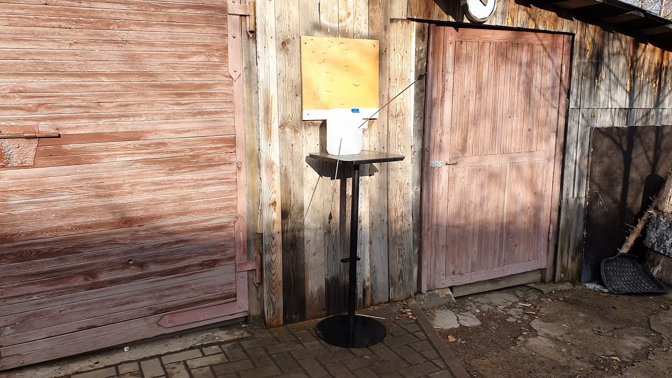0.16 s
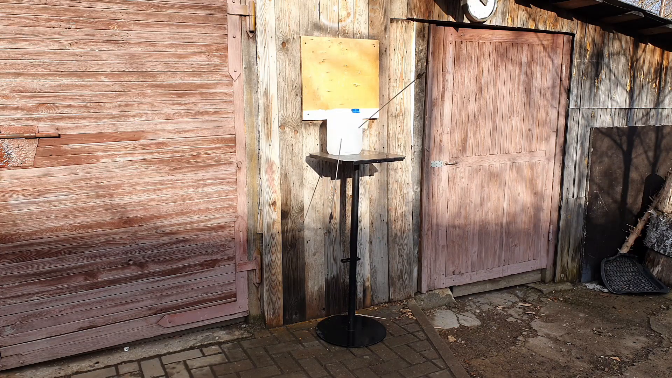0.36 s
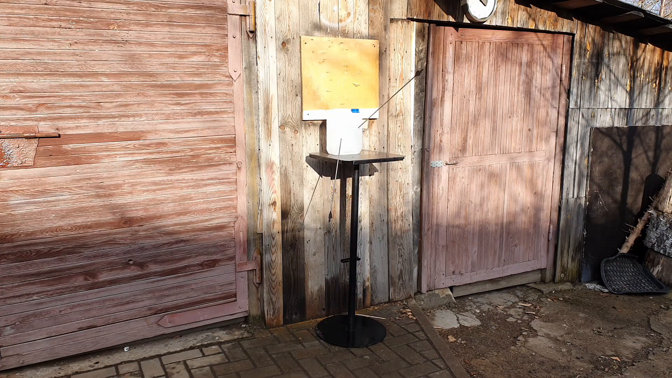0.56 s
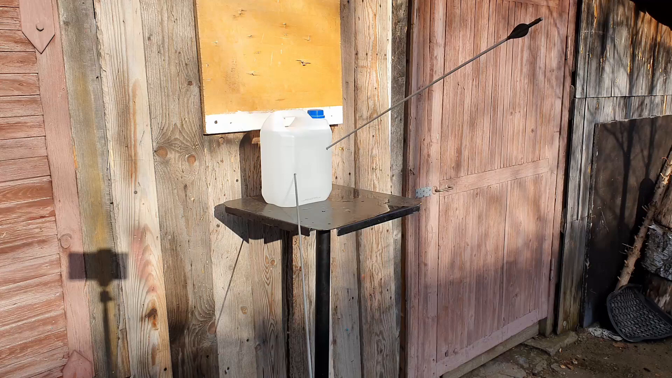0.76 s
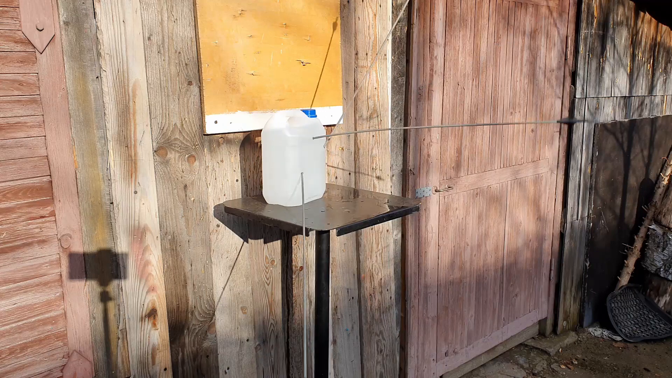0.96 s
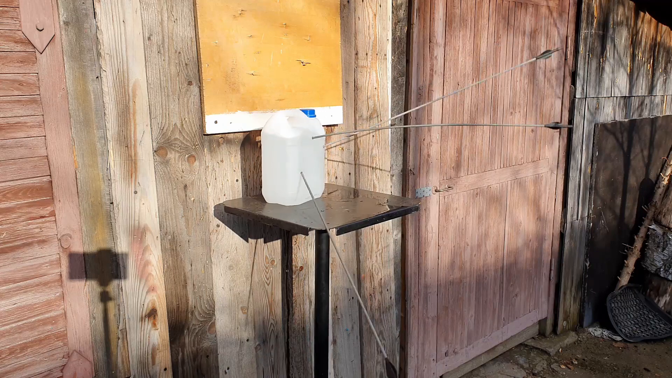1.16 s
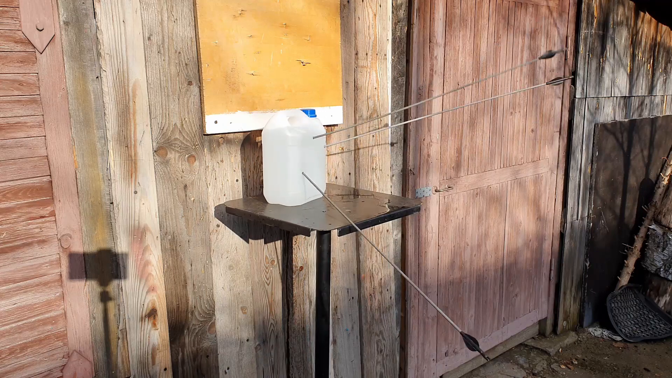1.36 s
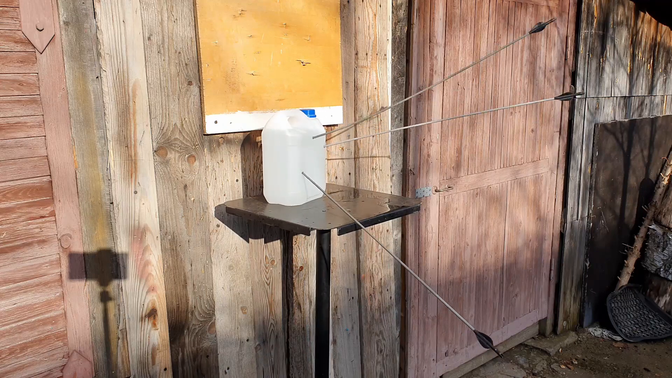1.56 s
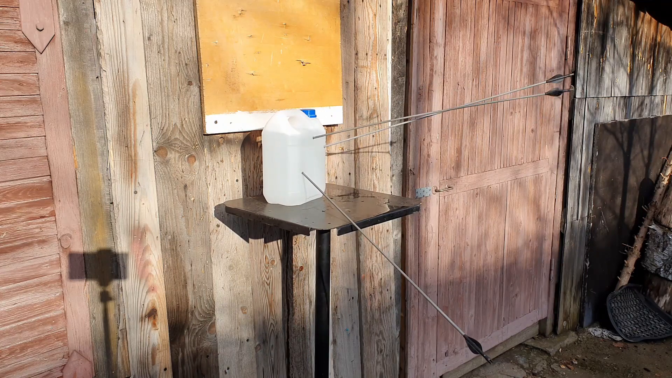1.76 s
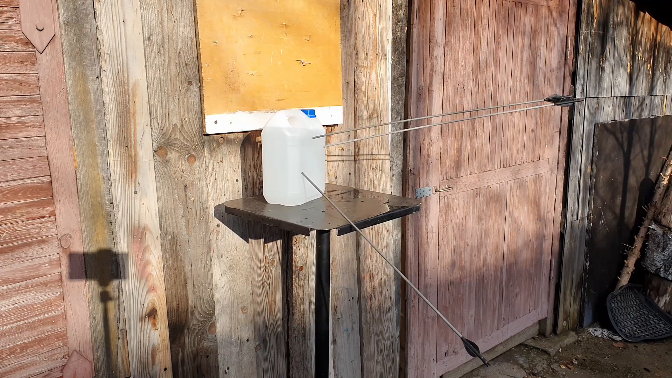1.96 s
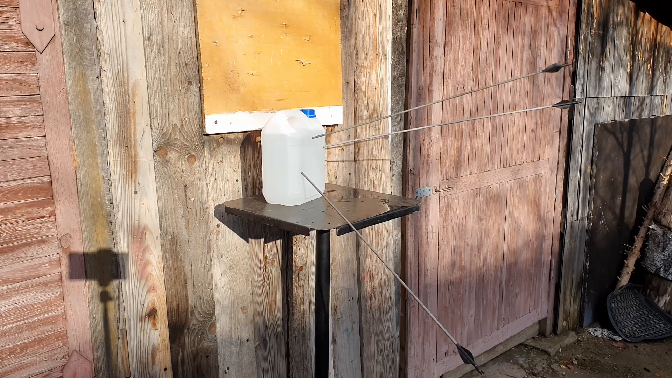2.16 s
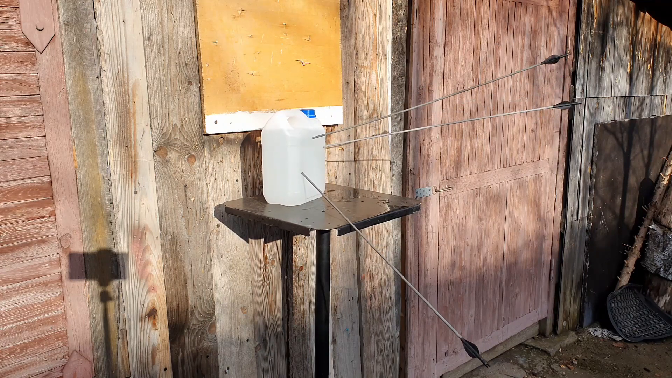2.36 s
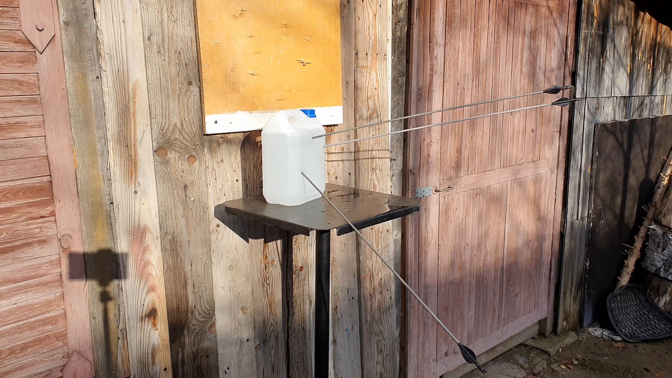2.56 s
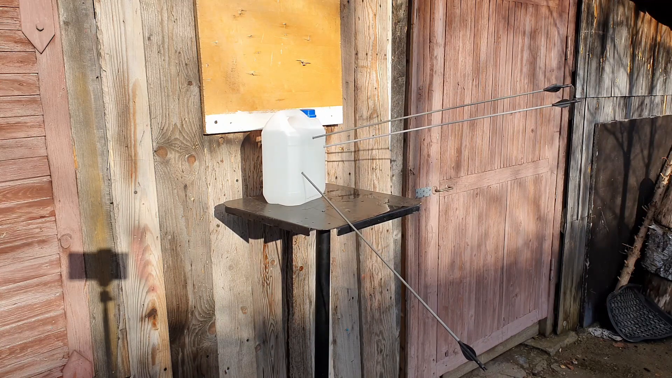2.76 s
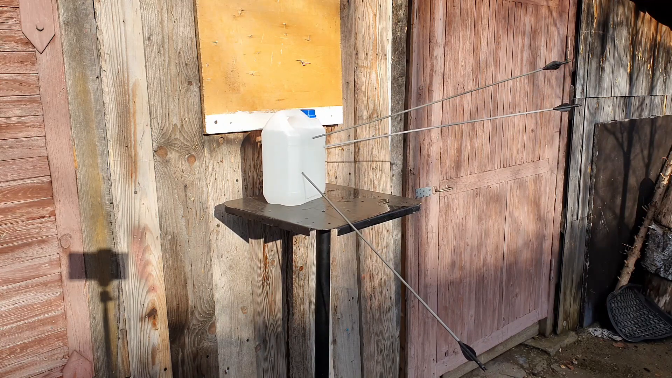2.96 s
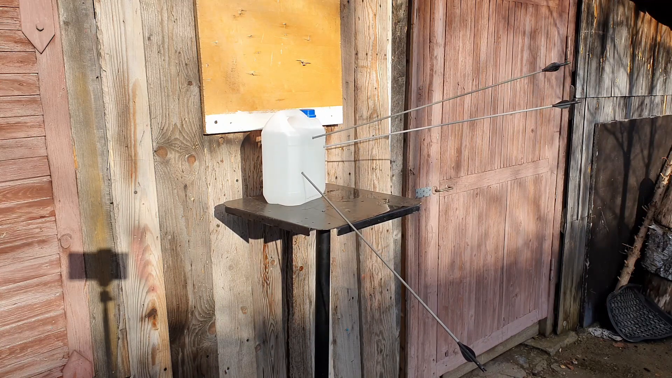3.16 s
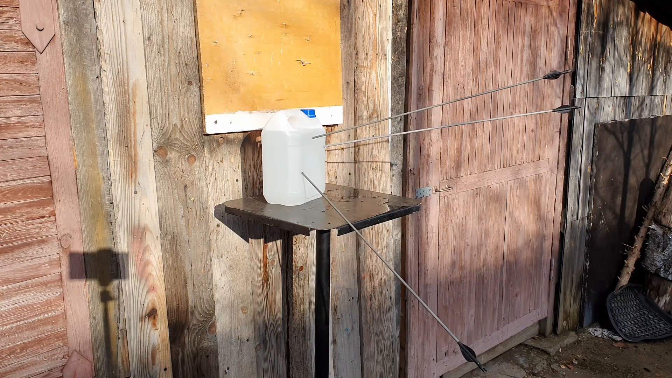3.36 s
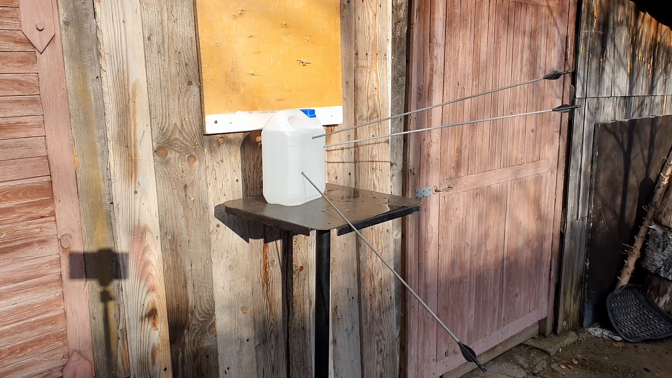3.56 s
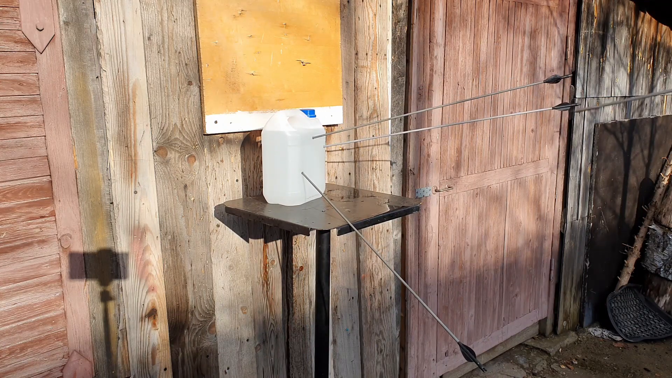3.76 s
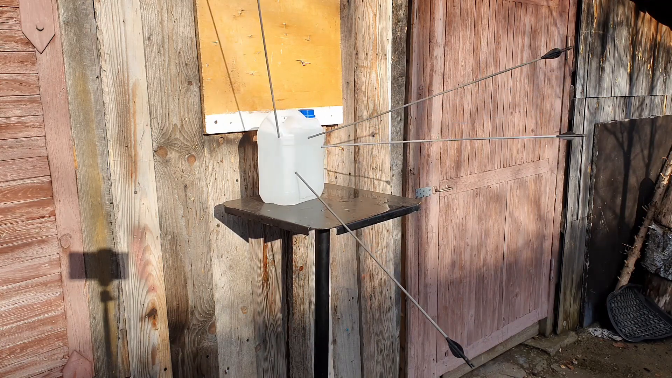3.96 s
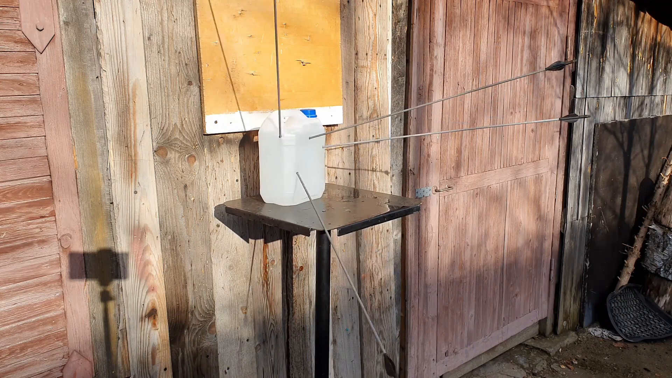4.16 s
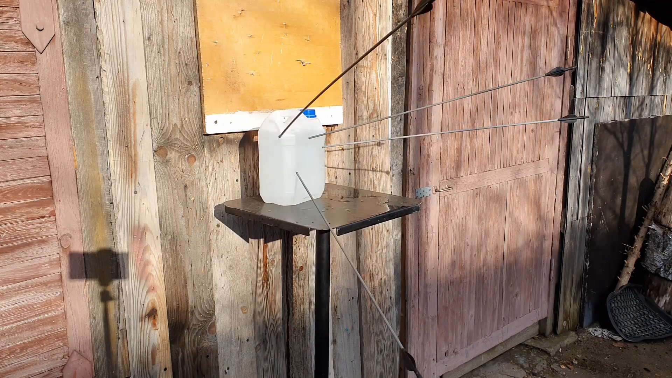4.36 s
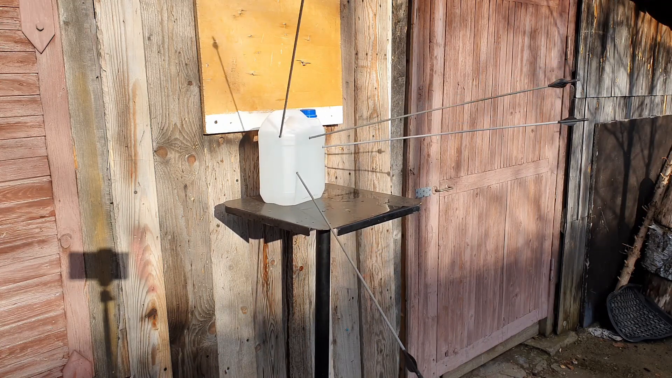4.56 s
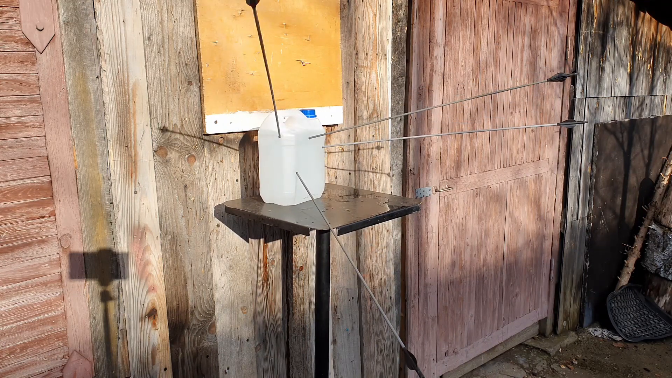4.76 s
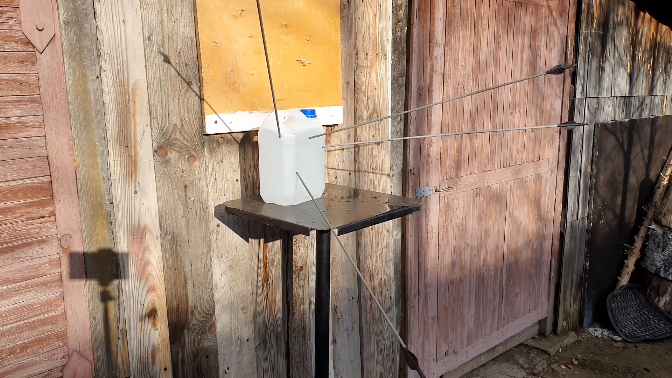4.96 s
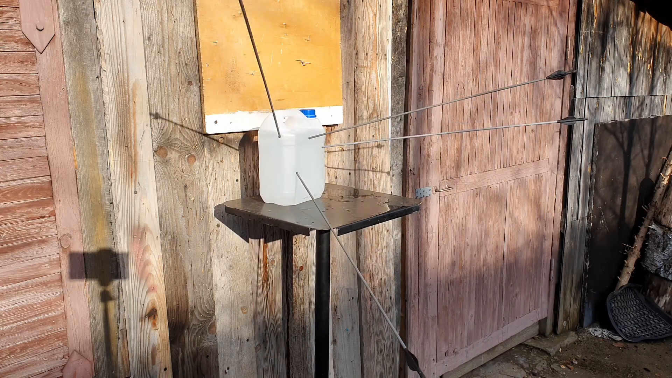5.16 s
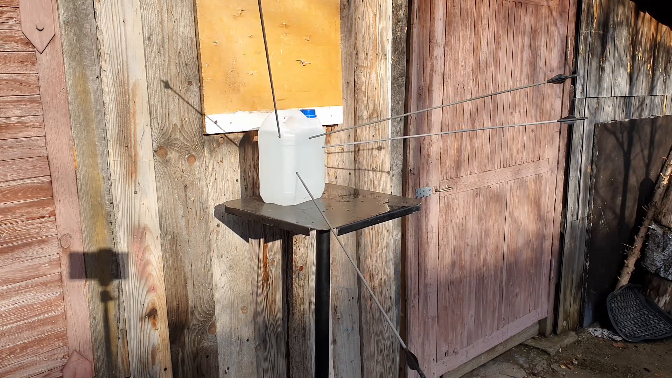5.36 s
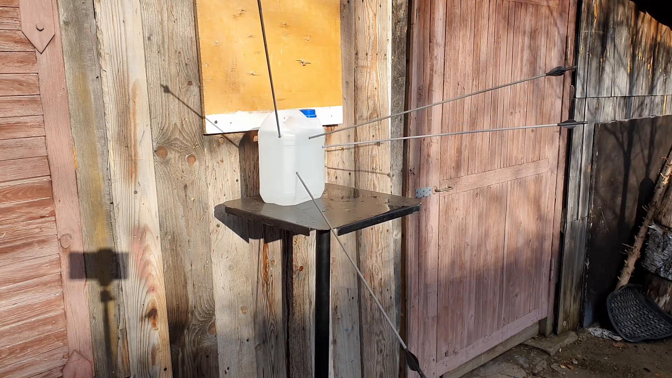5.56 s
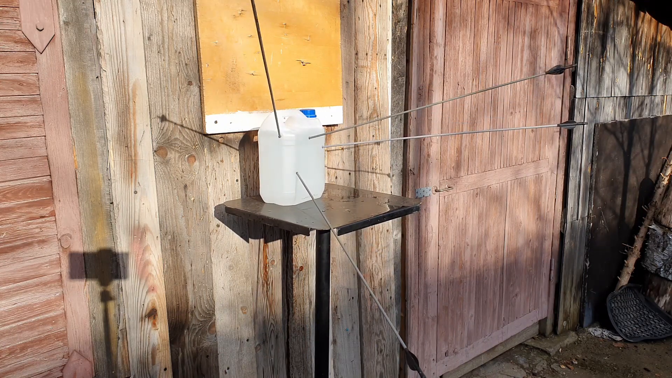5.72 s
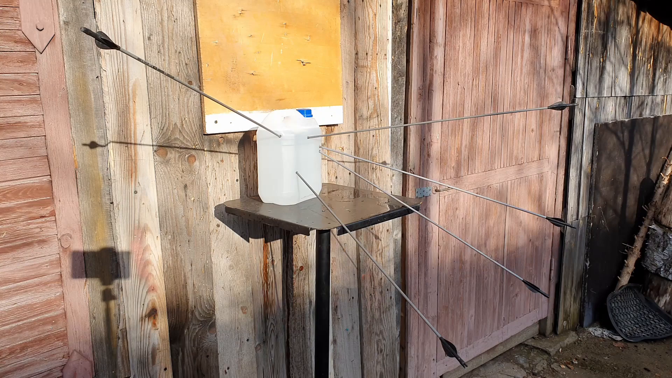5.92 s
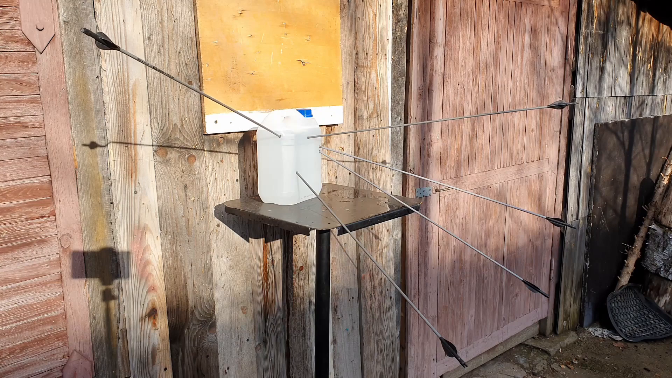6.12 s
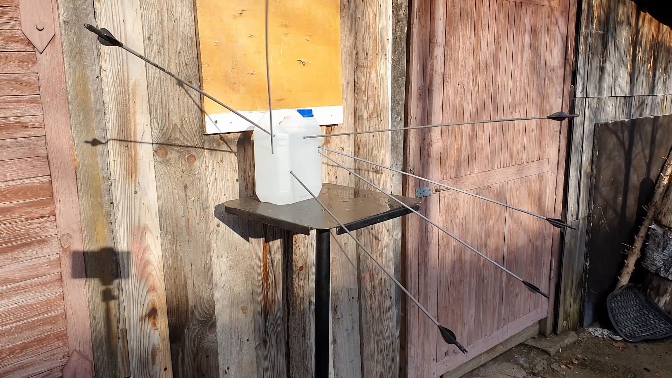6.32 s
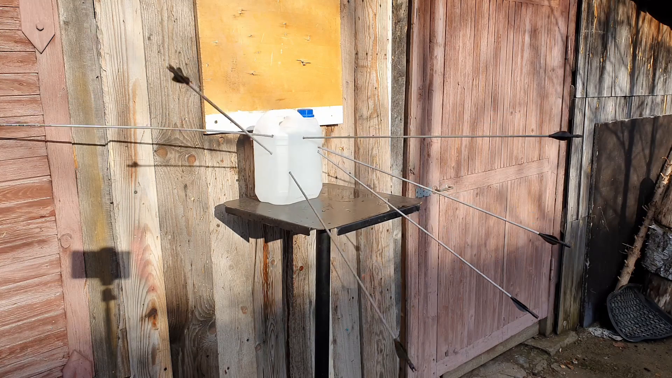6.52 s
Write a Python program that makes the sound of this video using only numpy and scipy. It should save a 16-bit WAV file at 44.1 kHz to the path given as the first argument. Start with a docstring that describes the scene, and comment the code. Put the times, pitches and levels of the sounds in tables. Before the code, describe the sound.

Three bow snaps, each followed by an arrow cracking into a plastic jug and booming plank wall, with shafts tapping and buzzing afterwards outdoors.

```python
"""Arrows crack into a plastic jug against the plank wall of a shed; their shafts then whip, tap and buzz.
Each contact is a cluster of ticks, filtered by the resonances of the jug and reflected by a quiet yard.
The blows excite decaying plank modes and a boom of the whole shed; the boards shudder after each knock.
Three shots begin with a bow snap and a hiss of air; rumble, a far hoot and a soft rush lie behind.
The right channel is the brighter one, and turns thin for the last shot."""
import sys
import numpy as np
from scipy import signal
from scipy.fft import rfft, irfft, next_fast_len
from scipy.io import wavfile

SR = 44100
rng = np.random.default_rng(int(sys.argv[2]) if len(sys.argv) > 2 else 0)


def dump(signal):
    """Clip the signal to [-1, 1] and save it as 16-bit WAV at the path in sys.argv[1]."""
    limited = np.clip(np.atleast_2d(signal).T, -1, 1)
    pcm = np.round(limited * 32767).astype(np.int16)
    wavfile.write(sys.argv[1], SR, pcm)


N = 290619

# resonances of the jug with the arrows in it: centre_hz, width_hz, level_db
JUG_MODES = [(232.1, 54, 8.5), (405, 12, 1), (831, 22, 2.5), (967, 44, 8.5), (1106.3, 49, 12.5),
             (1442, 37, 5.5), (1586, 67, 4.5), (1770, 39, 8.5), (1925, 45, 6.5), (2197, 24, 4.5),
             (2610, 45, 6), (2822, 80, 4.5), (3360, 54, 4.5), (3840, 54, 0), (4300, 39, 8), (4940, 150, 2),
             (5300, 130, -2.5), (5590, 110, 2), (5970, 72, 1.5)]
# spectra of the low, middle and high part of a contact: frequency_hz, density_db (per Hz, relative)
KNOCK_SPECTRUM = [(62, -18.5), (155, -4), (310, -2), (610, -2), (1120, -2), (1620, -6.5), (2320, -18.5),
                  (5050, -37)]
CLACK_SPECTRUM = [(510, -16.5), (1320, 7), (2020, 3.5), (3020, 2.5), (4520, -1.5), (6220, -2.5),
                  (7520, -14), (11100, -36.5)]
FIZZ_SPECTRUM = [(3550, -41), (7050, -0.5), (9050, 7.5), (12550, 1), (14550, -8), (16050, -9)]
CONTACT_SPECTRA = (KNOCK_SPECTRUM, CLACK_SPECTRUM, FIZZ_SPECTRUM)

CUT_S = 5.796  # all earlier ringing stops here, before the last shot


def amp(db):
    """Level to amplitude: 20 dB is a factor of ten."""
    return 10 ** (np.asarray(db) / 20)


def unit(x):
    """Normalization of x to an rms of 1."""
    return x / np.sqrt(np.mean(x ** 2) + 1e-20)


def along(points, hz):
    """Linear interpolation of (frequency, value) points on a logarithmic frequency axis."""
    f, v = np.transpose(points)
    return np.interp(np.log(hz + 1), np.log(f + 1), v)


def curve(rows):
    """Linear interpolation of (time, value) rows to one value per sample."""
    return np.interp(np.arange(N) / SR, *np.transpose(rows))


def add(track, s, sound):
    """Superposition: a sound joins the track at time s, and none rings past the cut."""
    start = max(round(s * SR), 0)
    stop = round(CUT_S * SR) if s < CUT_S else N
    part = sound[..., :max(stop - start, 0)]
    track[..., start:start + part.shape[-1]] += part


def coloured(x, gain):
    """Minimum-phase filtering: folding the cepstrum of a gain over frequency makes it causal."""
    n = x.shape[-1]
    m = 2 * next_fast_len(n // 2 + 4096)
    log_gain = np.log(np.maximum(gain(np.fft.rfftfreq(m, 1 / SR)), 1e-6))
    cepstrum = irfft(log_gain, m)
    cepstrum[1:m // 2] *= 2
    cepstrum[m // 2 + 1:] = 0
    response = np.exp(rfft(cepstrum))
    return irfft(rfft(x, m) * response, m)[..., :n]


def shape(points):
    """Spectral shaping by a gain that keeps the power of white noise."""
    return lambda hz: unit(amp(along(points, hz)))


def diffuse(size):
    """Diffuse field: white stereo noise whose channels are most alike in the bass."""
    # correlation of the two channels: frequency_hz, correlation (0-1)
    correlation = [(102, 0.9), (505, 0.3), (1520, 0), (4050, .54), (12100, 0.5)]
    hz = np.fft.rfftfreq(size, 1 / SR)
    turn = np.arccos(np.clip(along(correlation, hz), 0, 1)) / 2
    noise = rfft(rng.standard_normal((2, size)))
    mid, side = irfft(noise * [np.cos(turn), np.sin(turn)], size)
    return np.array([mid + side, mid - side])


def yard(late_db=-19, stretch=3.0):
    """Reverberation of energy 1: near walls decay first, far ones last stretch times longer."""
    # decay of the near reflections: frequency_hz, t60_s
    decay = [(102, 0.5), (405, 0.27), (1520, 0.19), (5050, 0.12), (9050, 0.12), (15100, 0.14)]
    hz, t, z = signal.stft(diffuse(size=SR // 2), SR, nperseg=256)
    fall_db = -60 * t / along(decay, hz)[:, None]
    envelope = amp(fall_db) + amp(late_db + fall_db / stretch)
    tail = signal.istft(z * envelope, SR, nperseg=256)[1]
    return tail / np.linalg.norm(tail[0])


def chatter(length, rate, spread_db):
    """Contact chatter of energy 1: a first tick, then random ticks of uneven size."""
    t = np.arange(SR // 8) / SR
    sizes = rng.choice([-1, 1], len(t)) * amp(spread_db * rng.standard_normal(len(t)))
    ticks = sizes * (rng.random(len(t)) < rate / SR) * (t < length)
    ticks[0] = amp(spread_db - 6.0)
    return ticks / np.linalg.norm(ticks)


def strikes(rows, rate, spread_db, direct):
    """Direct and reverberant energy: knock, clack and fizz excitations, direct = straight share of each."""
    tracks = np.zeros((3, 2, N))
    share = np.clip(direct, 0, 1)[:, None, None]
    for s, length, *band_db in rows:
        ticks = chatter(length, rate, spread_db)
        wet = signal.fftconvolve(yard(), ticks[None], axes=1)
        first = np.pad(ticks, (0, wet.shape[1] - len(ticks)))
        straight = np.array([first, np.roll(first, 2)])  # reaches the left two samples earlier
        mix = np.sqrt(share) * straight + np.sqrt(1 - share) * wet
        add(tracks, s, amp(band_db)[:, None, None] * mix)
    return tracks * np.sqrt(SR / 100)


def ring(modes, scatter_db, attack):
    """Modal decay: a sum of exponentially fading sines, at new strengths for every blow."""
    t = np.arange(SR // 2) / SR
    hz, t60, db = np.transpose(modes)[:, :, None]
    level = db + scatter_db * rng.standard_normal(hz.shape)
    partials = amp(level - 60 * t / t60) * np.sin(2 * np.pi * hz * t)
    return partials.sum(0) * (1 - np.exp(-t / attack))


def flutter(rate, depth_db):
    """Random amplitude modulation: the uneven loudness of a whipping shaft, for half a second."""
    samples = np.arange(SR // 2)
    knots = rng.standard_normal(SR // 2)
    return amp(depth_db * np.interp(samples * rate / SR, samples, knots))


def rumble():
    """Low-frequency noise: the rumble of the air, with a slowly changing level."""
    # time_s, level_db (before the lift below)
    levels = [(0.0, -77.5), (0.81, -83), (0.99, -70.5), (3.08, -76.5), (3.95, -77), (4.55, -81),
              (6.29, -69), (6.59, -57)]
    # frequency_hz, density_db
    spectrum = [(20, -17), (46, 4), (71, 6), (112, -11.5), (202, -28), (505, -59.5)]
    lift_db = 8
    return amp(curve(levels) + lift_db) * coloured(diffuse(size=N), shape(spectrum))


def wash():
    """Band-limited noise: a soft, far rush after the cut, Gaussian in octaves."""
    level_db, centre_hz, width_octaves = -79.5, 1060, 0.43
    band = lambda hz: unit(np.exp(-(np.log2((hz + 1) / centre_hz) / width_octaves) ** 2 / 2))
    return amp(level_db) * (np.arange(N) / SR > CUT_S) * coloured(diffuse(size=N), band)


def hoot():
    """Pure tone: one soft, far sine under a sine-squared envelope."""
    start_s, length_s, pitch_hz, level_db = 0.22, 0.12, 520.7, -61
    t = np.arange(N) / SR
    swell = np.sin(np.pi * np.clip((t - start_s) / length_s, 0, 1)) ** 2
    return amp(level_db) * swell * np.sin(2 * np.pi * pitch_hz * t)


def swings(first, last, swing, quickening):
    """Quickening oscillation: tap times of a swaying shaft, each swing shorter than the one before."""
    gaps = np.exp(-quickening * np.arange(max(round((last - first) / swing), 1)))
    return first + (last - first) * np.append(0, np.cumsum(gaps)) / gaps.sum()


def contacts():
    """Impact hardness sets the spectrum: thuds, clacks and taps as (s, length, knock, clack, fizz dB)."""
    # dull thuds of arrows on jug and wood: start_s, length_s, knock_db
    thud_rows = [(.09, .02, -59), (0.862, 0.0067, -21), (.938, 0.0068, -36.5), (3.793, .0062, -25.5),
                 (3.819, .003, -28.5), (6.298, .028, -24), (6.334, .018, -26), (6.487, .015, -34.5)]
    # hard clacks of a point or shaft on the jug: start_s, length_s, clack_db, brightness_db (fizz over clack)
    clack_rows = [(.8466, 0.0018, -38.5, 7.5), (.868, .014, -32, -14), (.883, 0.0029, -38, -3),
                  (.981, 0.013, -48, -25), (1.122, 0.0061, -55, -20), (1.15, .007, -40, -10.5),
                  (1.195, 0.0059, -47.5, -7.5), (1.262, 0.0029, -51, -7.5), (1.483, 0.024, -48.5, -3.5),
                  (1.862, 0.03, -50.5, -3.5), (2.247, 0.0061, -64.5, -10), (2.536, 0.029, -53.5, 2),
                  (2.6, 0.051, -57, -1), (2.853, 0.046, -55.5, -4), (3.8044, 0.0055, -31.5, -0.5),
                  (3.948, .0066, -45, 4), (3.968, 0.026, -41, -6), (4.024, 0.018, -45.5, -2),
                  (4.299, .005, -57.5, -2.5), (5.105, .07, -70.5, -22), (5.745, 0.0052, -57, 7.5),
                  (5.7535, .002, -50.5, 3), (6.291, 0.051, -39.5, 0), (6.3615, 0.019, -35, 3),
                  (6.4134, 0.0049, -37, 5), (6.428, 0.029, -37, -23), (6.509, 0.02, -32.5, -7),
                  (6.58, 0.0085, -56, 5)]
    # a swaying shaft taps the jug once a swing: first_tap_s, last_tap_s, mean_swing_s,
    # quickening_per_swing, first_tap_db, loss_per_tap_db, tap_length_s, brightness_db
    sway_rows = [(.134, .511, .19, .02, -63.5, 1.5, .028, -17),
                 (1.595, 1.731, .067, .45, -41.5, 13, .006, -7),
                 (1.858, 2.776, .131, .032, -52.5, 0.27, .014, -11.5),
                 (2.973, 3.11, .065, .05, -57, 7, 0.033, -10.5),
                 (4.056, 4.177, 0.12, .1, -44, 21, .014, -11),
                 (4.416, 4.69, .092, .12, -63.5, -0.83, .013, -20.5),
                 (5.073, 5.681, .304, .15, -65, 2.5, .007, -18.5)]
    thud_clack_db, thud_fizz_db = -15.5, -29.5  # against the knock of a thud
    knock_over_db = 2.5  # the hollow knock over its clack

    clacks = list(clack_rows)
    for first, last, swing, quickening, db, loss_db, length, bright_db in sway_rows:
        for k, s in enumerate(swings(first, last, swing, quickening)):
            clacks.append((s, length, db - loss_db * k, bright_db))
    thuds = [(s, length, db, db + thud_clack_db, db + thud_fizz_db) for s, length, db in thud_rows]
    return thuds + [(s, length, db + knock_over_db, db, db + bright_db)
                    for s, length, db, bright_db in clacks]


def shudder():
    """Energy build-up and decay: each knock adds to the trembling of the boards, which then fades."""
    # creak of the boards: frequency_hz, density_db
    spectrum = [(41, -8), (102, 7.5), (222, -4.5), (405, -17.5), (910, -15), (2520, -40.5)]
    hardest_db, growth = -61.5, 0.34  # after the hardest knock; dB more for each dB of knock
    fade_db_per_s, rest_db = 27.5, -73
    times, _, knock_db, _, _ = np.transpose(contacts())
    kicks = amp(hardest_db + growth * (knock_db - knock_db.max())) ** 2
    kept = amp(-fade_db_per_s / SR) ** 2  # share of the energy left after one sample
    impulses = np.bincount(np.round(times * SR).astype(int), kicks, N)[:N]
    energy = signal.lfilter([1], [1, -kept], impulses)
    return np.sqrt(energy + amp(rest_db) ** 2) * coloured(diffuse(size=N), shape(spectrum))


def wall():
    """Plate modes and a diffuse boom: the struck plank rings, the shed booms after it, the boards shudder."""
    # blows that reach the wall: start_s, plank_db, boom_db, boom_delay_s
    blows = [(.878, -30, -27.5, 0.0065), (1.598, -54, -47, 0.00051), (3.803, -27, -25.5, 0.0065),
             (5.08, -67, -61, .02), (5.69, -73, -65.5, .015), (6.296, -27.5, -28.5, 0.00089)]
    # modes of the planks: pitch_hz, t60_s, level_db
    plank_modes = [(100.7, .42, 0.5), (165.2, 0.17, -1.5), (196.8, .33, 4), (402, 0.22, -6),
                   (436, 0.29, -6.5), (469, 0.54, -8.5), (576.6, 0.27, -5), (624, .24, -15),
                   (757, .27, -5.5), (857, .24, -11.5), (922.4, 0.16, -11.5), (994, 0.077, -12.5),
                   (1277, 0.61, -12), (1390, 0.092, -24.5)]
    # boom of the whole shed: frequency_hz, density_db
    boom_spectrum = [(31, -28), (66, -19), (101, -2.5), (141, -3), (202, 0.5), (302, -8.5), (505, -5.5),
                     (905, -24), (2020, -26), (5050, -59.5)]
    planks, boom = np.zeros((2, 2, N))
    for s, plank_db, boom_db, delay in blows:
        add(planks, s, amp(plank_db) * ring(plank_modes, scatter_db=2.5, attack=0.0027))
        add(boom, s + delay, amp(boom_db) * yard() * np.sqrt(SR / 50))
    return planks + coloured(boom, shape(boom_spectrum)) + shudder()


def flights():
    """Flow noise: air hisses over the vanes until the arrow lands."""
    # arrows in the air: start_s, end_s, level_db
    spans = [(0.74, 0.858, -80.5), (3.685, 3.788, -82), (6.162, 6.301, -74.5)]
    t = np.arange(N) / SR
    level = sum(amp(db) * ((t > start) & (t < end)) for start, end, db in spans)
    hiss = shape([(210, 0.5), (810, 11.0), (2020, .5), (6050, -2.5), (9050, -14.5)])  # Hz, dB
    return coloured(level * diffuse(size=N), hiss)


def bow():
    """Impulsive release: a dense swish, mostly off the walls, and modal singing of the scraping arrow."""
    # string and arrow leaving the bow: start_s, length_s, knock_db, clack_db, fizz_db
    releases = [(0.667, 0.018, -55.5, -61, -68), (0.6835, 0.011, -41.5, -47.5, -42.5),
                (3.59, 0.022, -51.5, -62.5, -63.5), (3.608, 0.012, -49, -53, -54),
                (3.622, 0.0048, -48, -48.5, -52), (6.102, 0.014, -58.5, -67.5, -62),
                (6.117, 0.027, -50.5, -53.5, -51.5)]
    # the arrow sings as it scrapes past the bow: start_s, level_db
    zing_rows = [(0.688, -72), (3.625, -49.5), (6.131, -66.5)]
    # modes of that singing: pitch_hz, t60_s, level_db
    zing_modes = [(2750, 0.22, -2.5), (4893, 0.11, 2), (5389, .14, -1), (5830, 0.19, 3), (5740, 0.28, -4)]
    parts = strikes(releases, rate=6600, spread_db=-2, direct=[.15, .2, .2])
    out = sum(coloured(part, shape(points)) for part, points in zip(parts, CONTACT_SPECTRA))
    for s, db in zing_rows:
        singing = ring(zing_modes, scatter_db=0.0, attack=0.0062)
        add(out, s, amp(db) * singing * flutter(rate=220, depth_db=4.0))
    return out


def jug():
    """Cavity resonance: a square slap rings the hollow jug, mostly low; narrow modes last longest."""
    # square slaps of a shaft: start_s, level_db
    slaps = [(1.598, -59), (2.412, -72), (3.951, -68)]
    out = np.zeros((2, N))
    modes = [(hz, 3.1 / width, db) for hz, width, db in JUG_MODES]
    for s, db in slaps:
        add(out, s, amp(db) * ring(modes, scatter_db=-9, attack=0.0021))
    return coloured(out, shape(KNOCK_SPECTRUM))


def rebounds(s, db, count):
    """Repeated impact with loss: times and levels of two shafts that spring apart and meet again."""
    period_s, loss_db = .062, 13.5
    return [(s + k * period_s, db - k * loss_db) for k in range(count)]


def jug_peaks(hz):
    """Resonant gain: the powers of the jug's resonance peaks add to a flat response."""
    peaks = 1
    for centre, width, db in JUG_MODES:
        peaks = peaks + amp(db) ** 2 / (1 + (2 * (hz - centre) / width) ** 2)
    return np.sqrt(peaks)


def arrows():
    """Source and resonator: contacts sound through the jug; free shafts buzz on each other and ring on."""
    # shafts that touch and ring freely: start_s, buzz_length_s, level_db (before a 3 dB cut)
    touches = [(2.535, 0.029, -40.5), (2.743, 0.0099, -47.5), (2.831, 0.0046, -56), (2.8535, 0.023, -43.5),
               (3.006, 0.034, -56.5), (3.049, 0.0091, -58), (3.108, 0.025, -63), (5.105, 0.071, -62.5)]
    # modes of a shaft: pitch_hz, t60_s, level_db
    shaft_modes = [(3440, 0.11, -15), (3830, 0.1, -8.5), (4350, .1, -6.5), (4760, 0.015, 7.5),
                   (5260, 0.079, -5), (5310, 0.065, -7), (5940, 0.024, 0), (6110, 0.014, -1.5)]
    parts = strikes(contacts(), rate=1200, spread_db=3.0, direct=[.2, .4, .55])
    body = lambda points: lambda hz: unit(amp(along(points, hz)) * jug_peaks(hz))
    out = sum(coloured(part, body(points)) for part, points in zip(parts, CONTACT_SPECTRA))
    for first, length, first_db in touches:
        for s, db in rebounds(first, first_db, count=4):
            buzz = chatter(length, rate=800, spread_db=-0.3)
            ringing = ring(shaft_modes, scatter_db=2.5, attack=0.00033)
            ringing = ringing * flutter(rate=700, depth_db=3.5)
            add(out, s, amp(db - 3.0) * signal.fftconvolve(ringing, buzz))
    return out


def scene():
    """Superposition of bow, arrows, jug and wall over the rumble of air and faint far sounds."""
    shots = bow() + flights() + arrows() + jug() + wall()
    return shots + hoot() + wash() + rumble()


def record(dry):
    """Linear filtering: a brighter right channel that loses bass after the cut, faint hiss, a band limit."""
    # gain of the right channel: frequency_hz, gain_db
    right_lift = [(61, 7), (126, 2), (252, 4.5), (505, 9.5), (1010, 8), (2020, 13.5), (4040, 20.5),
                  (6310, 22), (7110, 7), (8520, 0), (12550, 3), (16050, -8)]
    # further gain of the right channel after the cut: frequency_hz, gain_db
    thinning = [(182, -14.5), (405, -0.5), (910, -3), (2520, -2.5), (6050, -3), (12100, -3.5)]
    # background hiss: frequency_hz, density_db
    hiss_spectrum = [(105, 7), (410, 8.5), (1020, 9), (2520, -3), (6050, -14.5), (12100, -11.5),
                     (16100, -16.5)]
    top_hz, hiss_db = 16400, -79.5
    left, right = dry[0], coloured(dry[1], lambda hz: amp(along(right_lift, hz)))
    late = np.clip((np.arange(N) / SR - CUT_S) / 0.015, 0, 1)  # crossfade of 15 ms
    thin = coloured(right, lambda hz: amp(along(thinning, hz)))
    right = (1 - late) * right + late * thin
    left = left * amp(0.66 * late)  # slightly louder after the cut
    hiss = amp(hiss_db) * coloured(rng.standard_normal((2, N)), shape(hiss_spectrum))
    pair = np.array([left, right]) + hiss
    return irfft(rfft(pair) * (np.fft.rfftfreq(N, 1 / SR) < top_hz), N)


dry = scene()
out = record(dry)
dump(out)
```